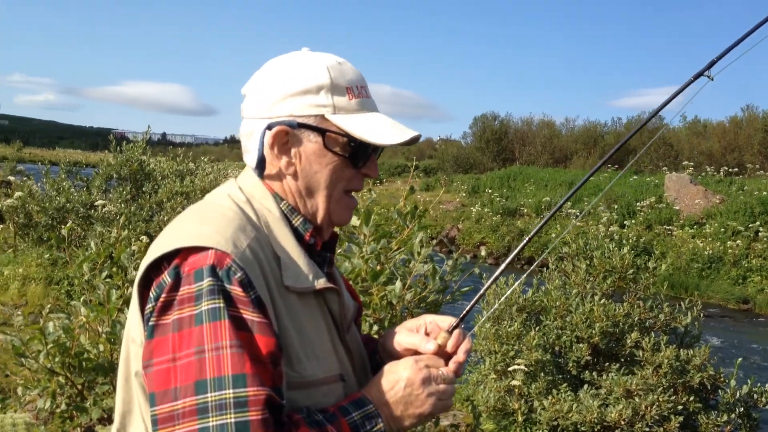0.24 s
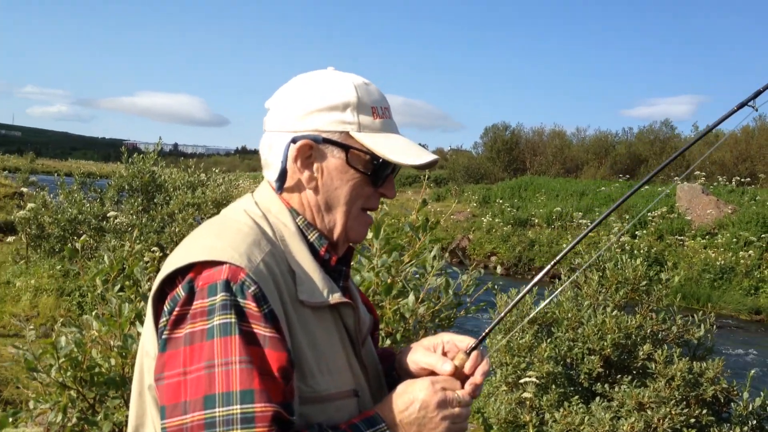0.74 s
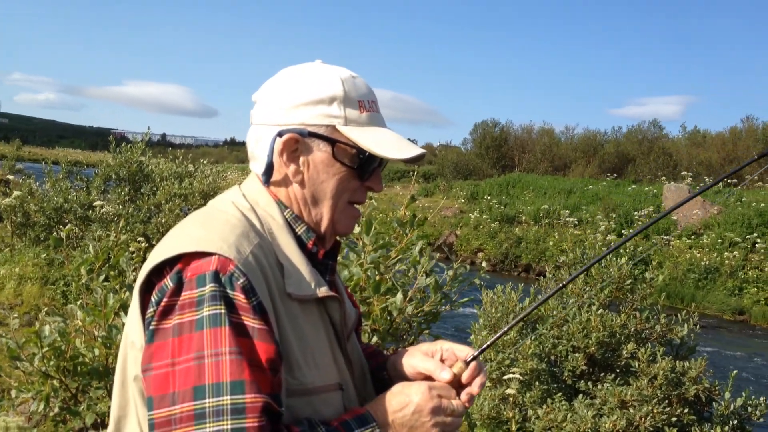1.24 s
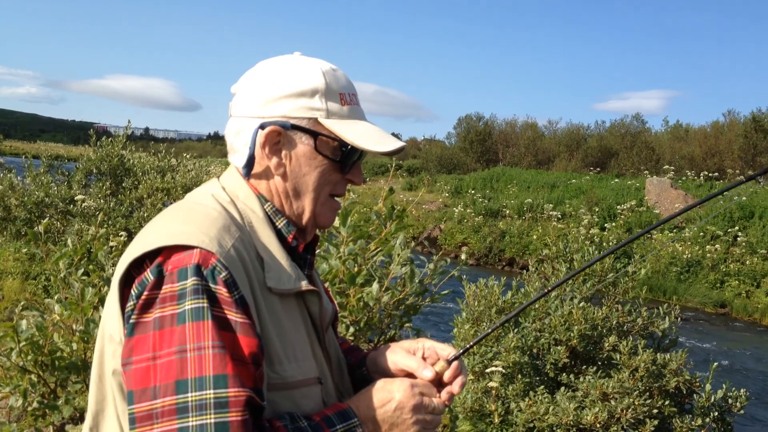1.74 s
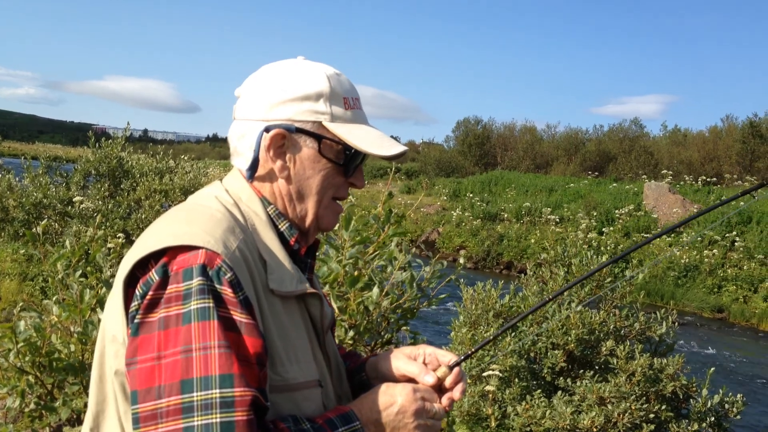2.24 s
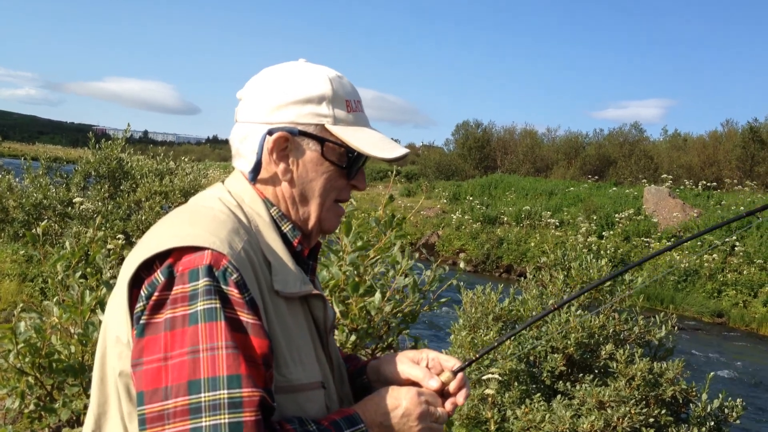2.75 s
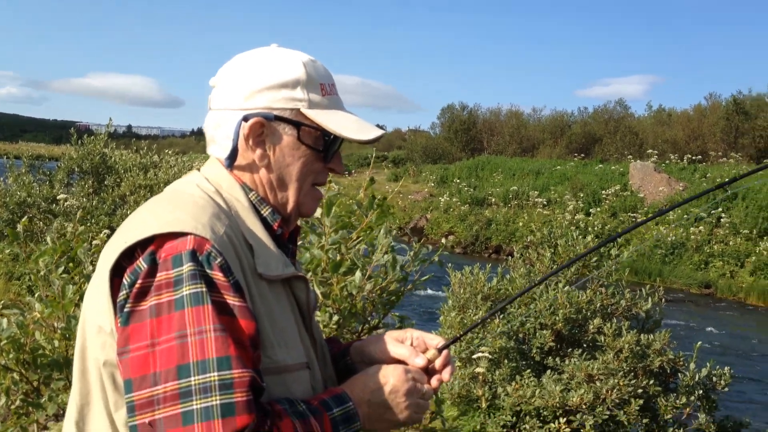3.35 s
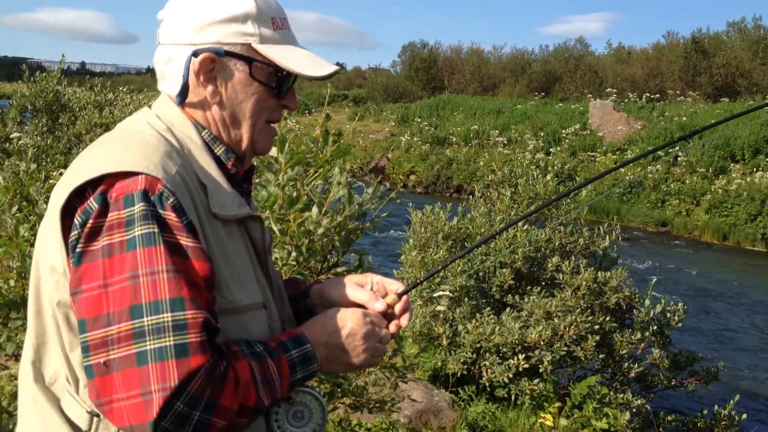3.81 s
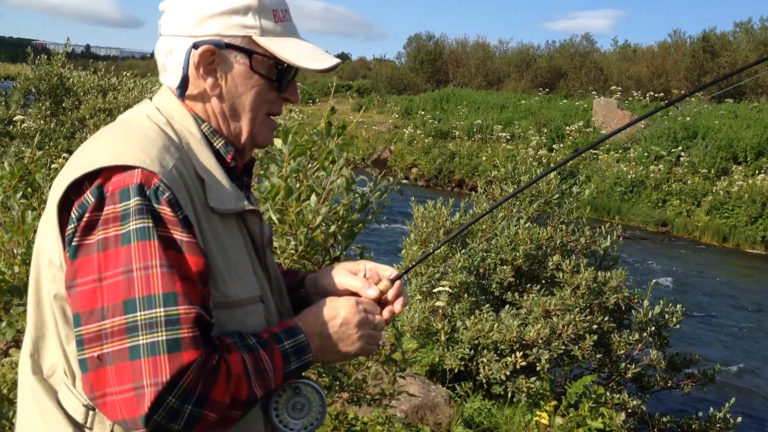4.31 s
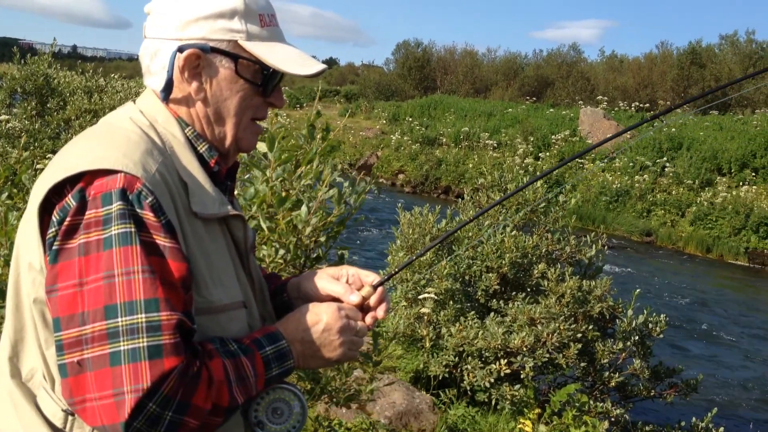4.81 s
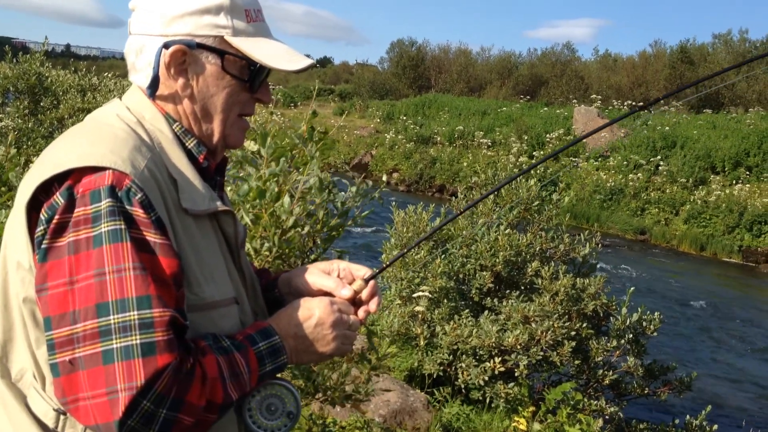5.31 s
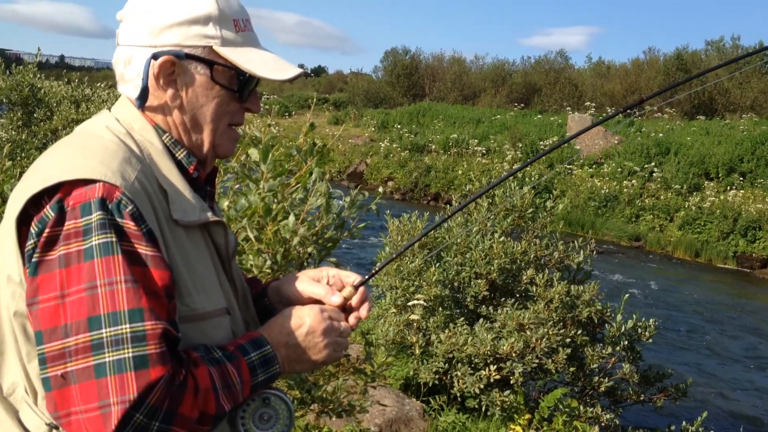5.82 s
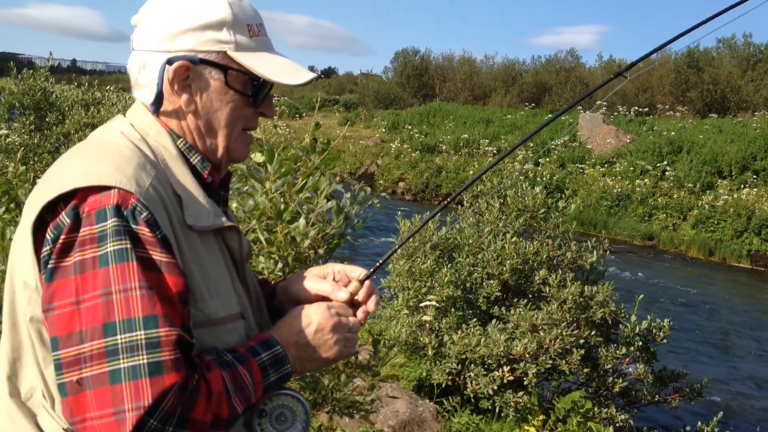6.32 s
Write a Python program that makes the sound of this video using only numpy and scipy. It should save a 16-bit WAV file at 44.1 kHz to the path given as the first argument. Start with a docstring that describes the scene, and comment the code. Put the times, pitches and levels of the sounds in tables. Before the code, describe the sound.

Close, crisp clicks of a reel's sprung pawl over an even, distant river rush. Mostly water and a few low wind puffs at first, then bursts of metallic ratcheting: a quick run, a few slow ticks, and a longer run accelerating to a buzzing rattle. After a short gap it clicks slower, with irregular pauses. Heavy muffled wind thuds hit the open-air microphone in the second half, easing toward the end.

```python
"""Throughout, a river rushes and bubbles: patchy shaped noise with small damped sines that climb in pitch.
A fish pulls line off a click-and-pawl reel in slow and fast runs: at each gear tooth the sprung pawl
snaps, a burst of ringing modes, followed by two echoes and a rattle of ringing noise.
Gusts buffet the microphone: swelling low noise, a sharper edge of noise, and short low pressure pushes."""
import sys
import numpy as np
from scipy import signal
from scipy.fft import rfft, irfft, next_fast_len
from scipy.io import wavfile
from scipy.ndimage import uniform_filter1d, map_coordinates

SR = 44100
rng = np.random.default_rng(int(sys.argv[2]) if len(sys.argv) > 2 else 0)


def decibels_to_gain(level_db):
    """Convert a level in decibels to a linear amplitude gain (20 dB per decade)."""
    exponent = np.asarray(level_db, float) / 20
    return 10 ** exponent


def inscribe(sig):
    """Save sig as 16-bit PCM at rate SR to the path in sys.argv[1].

    A 1-D sig is mono; a 2-D sig holds one channel per row.
    Samples are clipped to [-1, 1] before scaling.
    """
    pcm = np.round(np.clip(np.atleast_2d(sig).T, -1, 1) * 32767)
    wavfile.write(sys.argv[1], SR, pcm.astype(np.int16))


N = 289296
CLOCK_S = np.arange(N) / SR


def unit(x):
    """Scale to rms 1."""
    return x / np.sqrt(np.mean(x ** 2) + 1e-20)


def wobble(rate):
    """A smooth random curve through rate random points a second."""
    return map_coordinates(rng.standard_normal(size=N // 100), [CLOCK_S * rate])


def coloured(x, points):
    """Filter x by a curve of (pitch_hz, level_db) points, joined on a log pitch axis."""
    size = next_fast_len(x.shape[-1] + 8192)
    hz, db = np.transpose(points)
    log_hz = np.log(np.fft.rfftfreq(size, 1 / SR) + 1)
    gain = decibels_to_gain(np.interp(log_hz, np.log(hz), db, -120, -120))
    return irfft(rfft(x, size) * gain, size)[..., :x.shape[-1]]


def lay(start_s, rows):
    """Add up the rows in one track, each from its start time."""
    first = np.round(np.asarray(start_s) * SR).astype(int)[:, None]
    at = first + np.arange(rows.shape[1])
    return np.bincount(np.clip(at, 0, N).ravel(), rows.ravel(), N + 1)[:N]


def bubbles(start_s, level_db, pitch_hz, cycles, rise):
    """Damped sines whose pitch climbs as the bubble nears the surface."""
    u = np.arange(0, .02, 1 / SR) * np.asarray(pitch_hz)[:, None] / cycles
    fade = (1 - np.exp(-12 * u)) * np.exp(-3 * u)
    tone = np.sin(2 * np.pi * cycles * (u + rise * u * u))
    return lay(start_s, decibels_to_gain(np.asarray(level_db))[:, None] * fade * tone)


# relative spectrum of the rushing water: pitch_hz, level_db
RIVER_COLOUR = [(30, -64), (70, -27), (120, -10), (300, -6), (500, -9.5), (680, 0.5), (1000, -2),
                (1800, -1.5), (2750, -4.5), (4000, -11), (5500, -20.5), (7500, -27.5), (10000, -33.5),
                (13000, -30.5), (15400, -32)]
# strength of the flow, before river() lifts it 6.5 dB: time_s, level_db
RIVER_FLOW = [(0, -50.5), (.8, -53), (1.3, -50.5), (3, -52), (4.2, -50.5), (6.56, -50.5)]
# single bubbles that stand out: start_s, level_db, starting pitch_hz
SINGLE_BUBBLES = [(4.187, -26.5, 3740), (4.272, -26.5, 1960), (4.299, -27, 3670), (4.317, -27, 2860),
                  (4.338, -25, 1610), (4.386, -35, 4900)]


def river():
    """Patchy rush of distant water with small bubbles bursting over it."""
    cells = signal.stft(rng.standard_normal(N), nperseg=512)[2]
    field = uniform_filter1d(rng.standard_normal(cells.shape), size=8, axis=0)  # across pitch
    field = uniform_filter1d(field, size=6, axis=1)  # across time
    patches = signal.istft(cells * decibels_to_gain(1.5 * unit(field)), nperseg=512)[1][:N]
    place, pitch, size = rng.random(size=(3, 2500))
    fizz_db = -3.5 * np.log(size + 0.0038)  # a few are much louder
    fizz_hz = 1000 * 5.5 ** (pitch ** 1.3)
    fizz = bubbles(place * N / SR, fizz_db, fizz_hz, cycles=2.6, rise=0.081)
    rush = unit(coloured(patches, RIVER_COLOUR)) + decibels_to_gain(-10) * unit(fizz)
    flow_db = np.interp(CLOCK_S, *np.transpose(RIVER_FLOW)) + 6.5 + 0.093 * wobble(7.8)
    return decibels_to_gain(flow_db) * rush + bubbles(*np.transpose(SINGLE_BUBBLES), cycles=9.3, rise=0.11)


# the spool's travel: time_s, teeth passed (count)
SPOOL_TRAVEL = [(0.0383, 0), (1.7577, 1), (1.7993, 2), (1.867, 4), (1.8948, 5), (1.9265, 6), (1.9553, 7),
                (1.9803, 8), (2.0534, 11), (2.109, 14), (2.1265, 15), (2.1432, 16), (2.1636, 17),
                (2.2298, 20), (2.2849, 22), (2.3127, 23), (2.3706, 25), (2.4557, 27), (2.5165, 28),
                (2.5455, 29), (2.6507, 30), (2.7729, 31), (2.8201, 32), (2.8608, 33), (2.8904, 34),
                (2.9322, 36), (2.9493, 37), (2.9885, 40), (3.0005, 41), (3.0428, 44), (3.0764, 46),
                (3.1082, 48), (3.16, 51), (3.1993, 53), (3.2565, 56), (3.3166, 59), (3.3374, 60),
                (3.3915, 63), (3.4056, 64), (3.4322, 66), (3.4474, 67), (3.4683, 68), (3.5027, 69),
                (3.5309, 70), (3.5533, 71), (3.5757, 72), (3.6198, 74), (3.6469, 76), (3.6566, 77),
                (3.6893, 81), (3.7216, 85), (3.7523, 89), (3.7797, 93), (3.8049, 97), (3.8301, 101),
                (3.8838, 109), (3.9118, 113), (3.9413, 117), (3.9745, 121), (4.0142, 125), (4.065, 129),
                (4.0807, 130), (4.1003, 131), (4.1305, 132), (4.5713, 133), (4.6079, 134), (4.66, 135),
                (4.706, 136), (4.7406, 137), (4.7772, 138), (4.818, 139), (4.8945, 141), (4.9308, 142),
                (4.9775, 143), (5.0971, 144), (5.1568, 145), (5.2138, 146), (5.245, 147), (5.285, 148),
                (5.3378, 149), (5.3832, 150), (5.4252, 151), (5.4856, 152), (5.6998, 153), (5.7517, 154),
                (5.7918, 155), (5.8393, 156), (5.9269, 158), (5.974, 159), (6.0236, 160), (6.0932, 161)]


def tooth_times():
    """The spool has inertia: within a run the tooth times bend smoothly between the rows."""
    s, passed = np.transpose(SPOOL_TRAVEL)
    tooth = np.arange(passed[-1] + 1)
    k = np.clip(np.searchsorted(passed, tooth, "right") - 1, 0, len(s) - 2)  # row before each tooth
    span, slope = np.diff(passed)[k], np.gradient(s, passed)
    u = (tooth - passed[k]) / span
    step_s = np.diff(s)[k]
    bend = (1 - u) * (slope[k] * span - step_s) - u * (slope[k + 1] * span - step_s)
    return tooth, np.interp(tooth, passed, s) + u * (1 - u) * bend


# how the level of cage, body, rim and pawl follows the spool, one row a part: mean level_db,
# swing_db, swings per turn, loudest at (tooth number), db per doubling of speed, share of the pull
PART_FACING = [(-27, 2, 1, 23.9, 2.25, 1.54), (-30.5, 1.8, 2, 6.5, 0.88, 0.1),
               (-32.5, 1.1, 1, 24.1, 0, 0.3), (-37.5, .5, 1, 19, 2.44, 0.1)]
# how hard the line loads the pawl: time_s, pull_db
LINE_PULL = [(.04, 0), (1.76, -1), (1.84, 1), (1.95, -2), (2.1, 0.5), (2.18, -2), (2.36, 3), (2.8, 1),
             (3.1, 0.2), (3.3, -1.5), (3.42, 1), (3.6, -1.5), (3.9, -2), (4.13, 1), (4.95, 1.3), (5.1, 2.7),
             (5.7, 2.5), (5.8, 1), (6.1, 3)]


def part_levels(tooth, when_s):
    """Level in dB of each part at each tooth: it swings with the spool's angle, speed and pull."""
    teeth_per_turn = 24.8
    usual_hz, slowest_hz = 50, 20  # teeth a second
    teeth_hz = np.maximum(1 / np.gradient(when_s), slowest_hz)
    doublings = np.log2(teeth_hz / usual_hz)
    pull_db = np.interp(when_s, *np.transpose(LINE_PULL))
    levels = []
    for mean_db, swing_db, swings, loudest, faster_db, share in PART_FACING:
        angle = 2 * np.pi * round(swings) * (tooth - loudest) / teeth_per_turn
        levels.append(mean_db + swing_db * np.cos(angle) + faster_db * doublings + share * pull_db)
    return levels


def alike(noise, keep):
    """Rows that each keep a share of the row before: neighbouring teeth sound alike."""
    keep = np.clip(keep, 0, .99)
    fresh = np.sqrt(1 - keep ** 2)
    noise = np.vstack([noise[:1] / fresh, noise[1:]])
    return signal.lfilter([fresh], [1, -keep], noise, axis=0)


def snap(modes, t, teeth):
    """Every mode of a part swells and damps in a few milliseconds; each tooth is scaled to peak 1."""
    # the phase drifts as the spool turns
    face = rng.uniform(0, 2 * np.pi) + .14 * np.cumsum(rng.standard_normal(size=(teeth, 1)), axis=0)
    total = 0
    for hz, mode_db, rise_ms in modes:
        turn, scatter = rng.standard_normal(size=(2, teeth, 1))
        # the modes crest nearly together, 0.9 ms in
        phase = face + .7 * alike(turn, keep=.9) - 2 * np.pi * hz * .0009
        u = t / rise_ms * 1000
        swell = (u * np.exp(1 - u)) ** 1.68
        gain = decibels_to_gain(mode_db + 2.5 * alike(scatter, keep=0.6))
        total = total + gain * swell * np.sin(2 * np.pi * hz * t + phase)
    return total / np.abs(signal.hilbert(total)).max(axis=1, keepdims=True)


def ringing(noise, modes, share):
    """Noise rows through the part's resonances, each as wide as a share of its pitch."""
    f = np.fft.rfftfreq(noise.shape[1], 1 / SR)
    power = sum(decibels_to_gain(2 * db) / (1 + ((f - hz) / (share * hz)) ** 4) for hz, db, _ in modes)
    return unit(irfft(rfft(noise) * np.sqrt(power), noise.shape[1]))


# ringing modes of the reel's four parts: pitch_hz, relative level_db, rise_ms
CAGE_MODES = [(4440, 0, 1.15), (4790, -4.5, 1.05), (5200, -10, .9)]
BODY_MODES = [(1700, 5.9, 0.89), (2310, 5.64, 0.91), (3060, 4.3, 1.21), (3950, 6.5, 1.54)]
RIM_MODES = [(6060, 5.5, 0.77), (7150, -2, 0.78), (7770, 4.5, 0.59)]
PAWL_MODES = [(9540, -2, 0.59), (10930, 0, 0.83), (12500, -27.5, 0.93), (13100, -58, 0.61),
              (15300, -6.5, 0.78), (14600, -3, 1)]
# snap and rattle of cage, body, rim and pawl, one row a part: snap_db, rattle_db, early t60_s (time to
# fall 60 dB), late_db next to the early part, late t60_s, resonance width (share of pitch)
PART_RATTLE = [(2, -23, 0.066, -5.5, 0.17, 0.19), (3.4, -8.5, 0.034, -2.5, 0.052, 0.093),
               (2, -7.5, 0.034, -11, 0.13, 0.25), (6.5, -7, 0.098, -13.5, 0.043, 0.13)]
# echoes of the snaps off body and ground: delay_ms, level_db before colouring
SNAP_ECHOES = [(3.8, -14.5), (7.1, -18)]
# tone of the echoes: pitch_hz, level_db
ECHO_TONE = [(500, -26), (3000, 2), (4500, -6), (7700, 8), (10000, -13), (16000, -5)]
# dips where paths round the reel cancel: pitch_hz, level_db
PATH_DIPS = [(500, 0), (3650, 0), (3950, -7), (4200, 0), (6400, 0), (6700, -6), (7000, 0), (8200, 0),
             (8800, -15), (9600, 0), (16600, 0)]


def reel():
    """At each tooth the pawl snaps all four parts; the snap echoes twice and the parts rattle out."""
    tooth, crest_s = tooth_times()
    when = crest_s - .0009
    t = np.arange(4096) / SR
    short = t[t < .008]
    snaps, rattles = np.zeros((2, len(tooth), len(t)))
    parts = [CAGE_MODES, BODY_MODES, RIM_MODES, PAWL_MODES]
    for modes, level, row in zip(parts, part_levels(tooth, when), PART_RATTLE):
        snap_db, rattle_db, t60, late_db, late_t60, share = row
        level = level[:, None]
        snaps[:, :len(short)] += decibels_to_gain(level + snap_db) * snap(modes, short, len(tooth))
        fade = decibels_to_gain(-60 * t / t60) + decibels_to_gain(late_db - 60 * t / late_t60)
        fade = (1 - np.exp(-t / 0.00066)) * fade  # soft start
        noise = alike(rng.standard_normal(size=(len(tooth), len(t))), keep=.93)
        rattles += decibels_to_gain(level + rattle_db) * fade * ringing(noise, modes, share)
    # shift each tooth by the part of a sample that rounding its start leaves over
    late = (when * SR - np.round(when * SR))[:, None]
    shift = np.exp(-2j * np.pi * np.fft.rfftfreq(len(t)) * late)
    snaps, rattles = irfft(rfft([snaps, rattles]) * shift, len(t))
    echoes = sum(decibels_to_gain(db) * lay(when, np.roll(snaps, round(ms * SR / 1000), axis=1))
                 for ms, db in SNAP_ECHOES)
    return coloured(lay(when, snaps + rattles) + coloured(echoes, ECHO_TONE), PATH_DIPS)


# gusts on the microphone: full from start_s, hold_s, buffet_db before wind() lowers it 1 dB
GUST_TIMES = [(0.183, 0.07, -54), (0.728, 0.062, -34.5), (0.813, 0.024, -42.5), (1.09, .12, -47),
              (1.254, 0.011, -37.5), (1.285, 0.018, -45.5), (1.559, 0.021, -54), (1.65, .01, -49.5),
              (1.925, 0.016, -49.5), (2.91, 0.016, -45), (3.105, 0.019, -43.5), (3.171, .01, -37),
              (3.22, 0.035, -32.5), (3.281, 0.03, -30.5), (3.356, .03, -42), (3.43, 0.061, -36),
              (3.546, 0.013, -44), (3.593, 0.046, -30.5), (3.683, 0.065, -29), (3.795, 0.095, -27),
              (3.92, 0.19, -25), (4.16, .08, -30.5), (4.27, 0.14, -29.5), (4.463, 0.12, -26),
              (4.63, 0.024, -28), (4.7, .02, -39), (4.743, 0.16, -27.5), (4.882, .22, -29),
              (5.138, 0.036, -36.5), (5.218, .02, -44.5), (5.367, 0.046, -39.5), (5.46, .02, -33.5),
              (5.524, .06, -35.5), (5.691, 0.011, -42), (5.775, 0.012, -40.5), (6.005, 0.0087, -37),
              (6.151, 0.11, -34.5), (6.285, .1, -45), (6.387, 0.043, -37.5), (6.486, 0.066, -39)]


def gusts():
    """Buffet level in dB over time: every gust rises, holds and falls at the same rates."""
    rise_db_per_s, fall_db_per_s, calm_db = 491, 482, -65
    t = np.arange(0, N + 64, 64) / SR
    s, hold, db = np.transpose(GUST_TIMES)[:, :, None]
    rise = rise_db_per_s * np.maximum(s - t, 0)
    fall = fall_db_per_s * np.maximum(t - s - hold, 0)
    power = decibels_to_gain(2 * (db - rise - fall)).sum(axis=0) + decibels_to_gain(2 * calm_db)
    return np.interp(CLOCK_S, t, 10 * np.log10(power))


# strongest wind pushes: middle time_s, level_db before push_sounds() lowers it 3.5 dB, pitch_hz
PUSHES = [(0.724, -15, 303), (0.738, -13, 250), (1.2481, -16, 206), (1.2603, -19.5, 213),
          (3.1642, -22, 228), (3.289, -9.5, 272), (3.309, -13.5, 222), (3.3233, -10.5, 307),
          (3.48, -18.5, 300), (3.605, -10, 330), (3.6753, -11, 450), (3.747, -11, 427), (3.787, -12, 384),
          (3.8223, -13, 375), (3.86, -6.5, 333), (3.8701, -13, 400), (3.909, -10.5, 338),
          (3.9613, -14, 289), (4.0037, -17, 260), (4.0163, -6, 346), (4.0551, -8.5, 406),
          (4.079, -10.5, 317), (4.0841, -6.5, 330), (4.112, -20, 330), (4.1253, -13, 383),
          (4.2889, -9.5, 283), (4.498, -15, 385), (4.5229, -6, 252), (4.5284, -11, 570), (4.586, -11, 335),
          (4.65, -16.5, 245), (4.8003, -9, 330), (4.8404, -11, 347), (4.8567, -9, 435), (4.8775, -15, 368),
          (4.8992, -8, 434), (4.9702, -9, 315), (4.997, -12.5, 300), (5.0562, -29, 277),
          (5.0834, -13.5, 320), (6.0109, -21, 216), (6.207, -20.5, 252), (6.4047, -19.5, 272)]
# the microphone's bass cut: pitch_hz, level_db
BASS_CUT = [(5, -60), (40, -26), (80, -52), (130, 3), (250, -1)]


def push_sounds():
    """Each pressure push is a short low wave that swells and fades round its middle."""
    s, db, hz = np.transpose(PUSHES)
    u = np.arange(-.012, .012, 1 / SR) * hz[:, None]
    phase = rng.uniform(0, 2 * np.pi, size=(len(s), 1))
    swell = np.exp(-np.abs(u / 0.48) ** 0.86)
    waves = decibels_to_gain(db - 3.5)[:, None] * swell * np.cos(2 * np.pi * u + phase)
    return coloured(lay(s - .012, waves), BASS_CUT + [(16000, 0)])


def sharp_edge(buffet_db):
    """Edge level in dB over time: it follows the gusts and flares at each push, more for quick ones."""
    edge_db, calm_db, strong_db = -41.5, -65.5, -27  # edge_db is reached at a buffet of strong_db
    edge_grows = 2.2  # dB of edge per dB of buffet
    flare_db, flare_s, flare_db_per_octave, usual_hz = -29, 0.01, 14, 330
    t = np.arange(0, N + 64, 64) / SR
    s, db, hz = np.transpose(PUSHES)[:, :, None]
    peak = decibels_to_gain(db + flare_db + flare_db_per_octave * np.log2(hz / usual_hz))
    flares = (peak * np.exp(-((t - s) / flare_s) ** 2)).sum(axis=0)
    flicker_db = 1.5 * wobble(30)
    steady = decibels_to_gain(edge_db + edge_grows * (buffet_db - strong_db) + flicker_db)
    return 20 * np.log10(steady + np.interp(CLOCK_S, t, flares) + decibels_to_gain(calm_db))


# relative spectrum of the low buffeting: pitch_hz, level_db per Hz
BUFFET_COLOUR = [(20, -38), (55, -31.5), (100, -10), (190, 2), (330, -7.5), (450, -14.5), (700, -35.5),
                 (1300, -90)]
# relative spectrum of the sharper edge: pitch_hz, level_db per Hz
EDGE_COLOUR = [(150, -4), (350, -4.5), (500, 1), (800, -7), (1300, -20.5), (2500, -66)]


def wind():
    """Eddies hit the membrane as uneven pushes; stronger gusts carry a sharper edge."""
    buffet_db = gusts()
    edge_db = sharp_edge(buffet_db)
    eddy = wobble(45)  # shared by low and edge
    low = unit(coloured(rng.standard_normal(N), BUFFET_COLOUR))
    low = unit(decibels_to_gain(1.2 * eddy + 1.24 * wobble(13)) * low)
    edge = unit(coloured(rng.standard_normal(N), EDGE_COLOUR))
    edge = unit(decibels_to_gain(1.2 * eddy + 3 * wobble(90)) * edge)
    return decibels_to_gain(buffet_db - 1.0) * low + decibels_to_gain(edge_db) * edge + push_sounds()


def scene():
    """River, reel and wind at one microphone."""
    return (river() + reel() + wind())[None]


def low_pass(x):
    """Removes everything above the highest recorded frequency."""
    return signal.sosfilt(signal.butter(12, 16640, fs=SR, output="sos"), x)


def record(dry):
    """Little passes above the band limit of 15330 Hz."""
    limit = [(5, 0), (15330, 0), (15370, -30), (16600, -40)]  # pitch_hz, level_db
    mix = coloured(dry, limit)
    return low_pass(mix)


dry = scene()
out = record(dry)
inscribe(out)
```